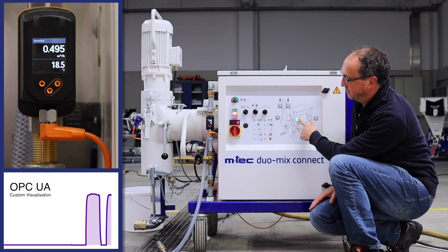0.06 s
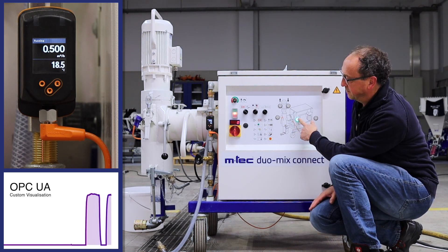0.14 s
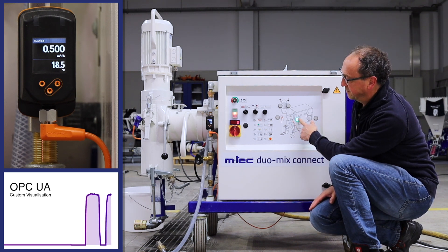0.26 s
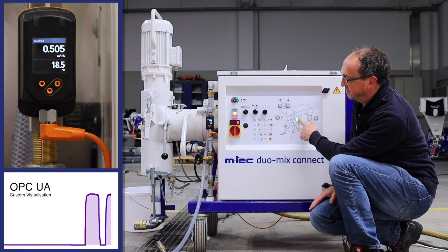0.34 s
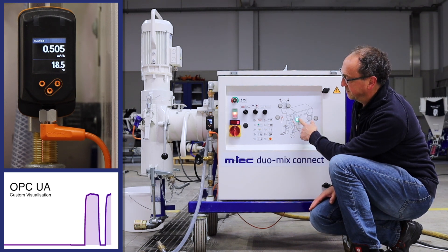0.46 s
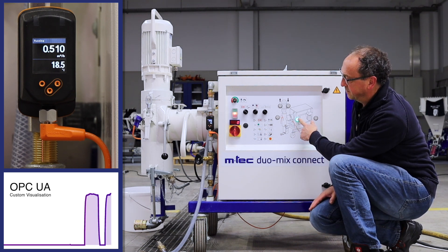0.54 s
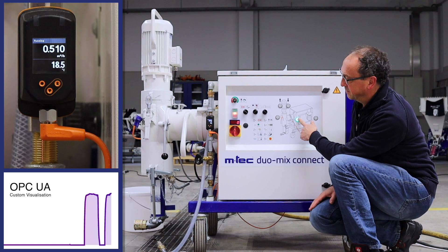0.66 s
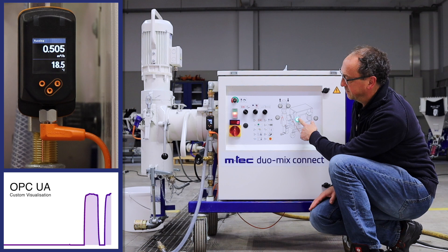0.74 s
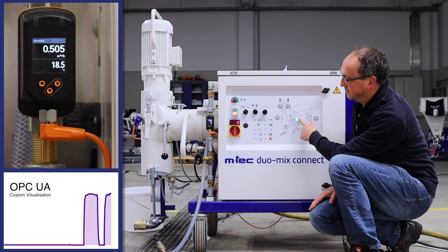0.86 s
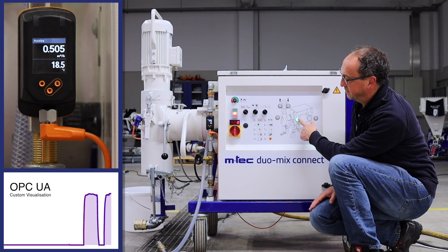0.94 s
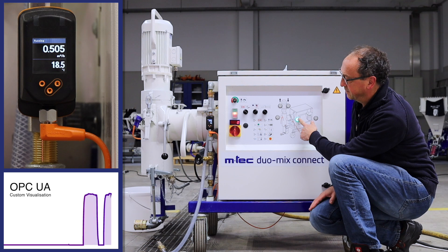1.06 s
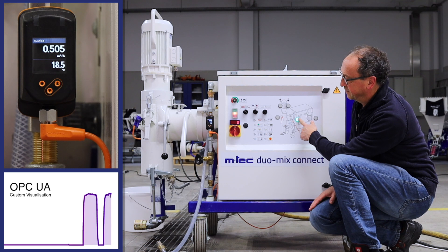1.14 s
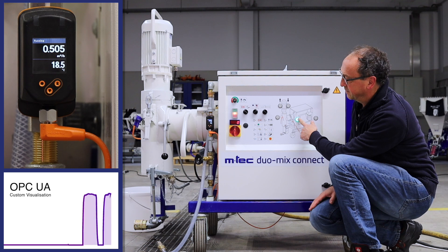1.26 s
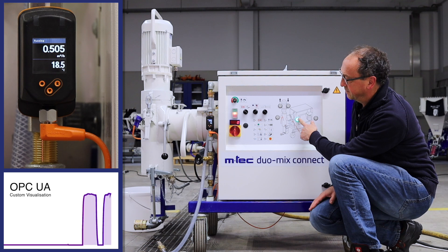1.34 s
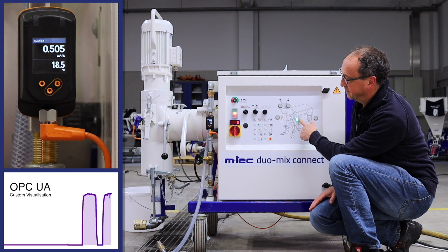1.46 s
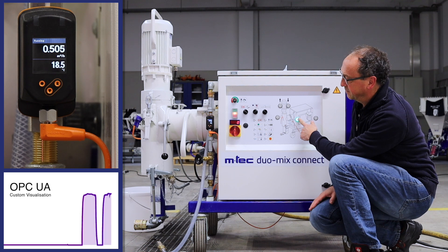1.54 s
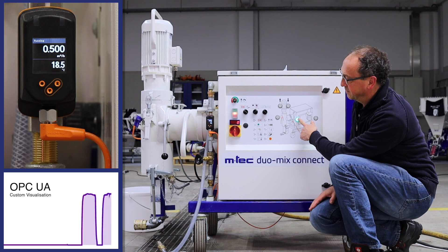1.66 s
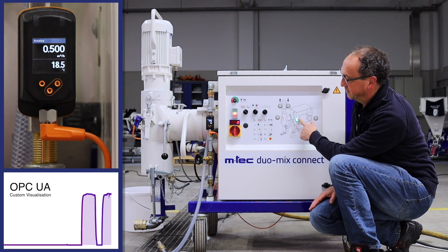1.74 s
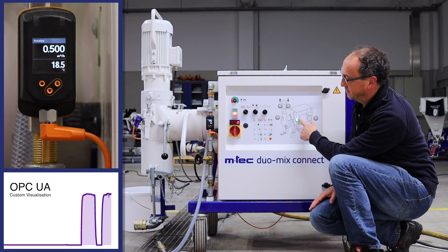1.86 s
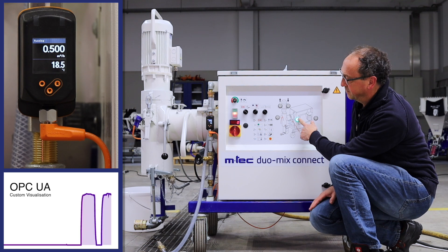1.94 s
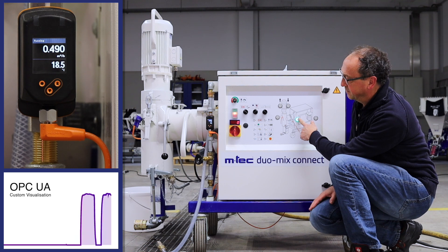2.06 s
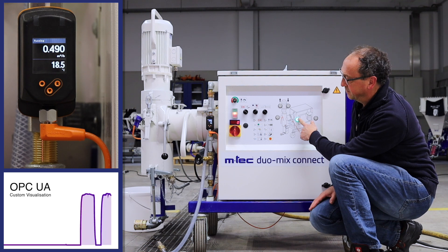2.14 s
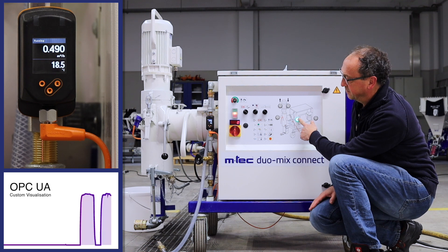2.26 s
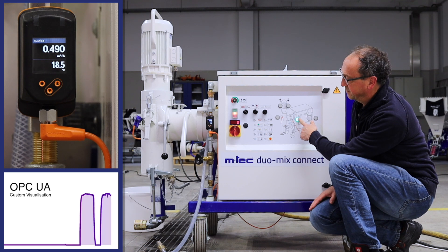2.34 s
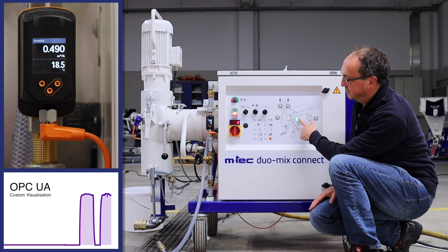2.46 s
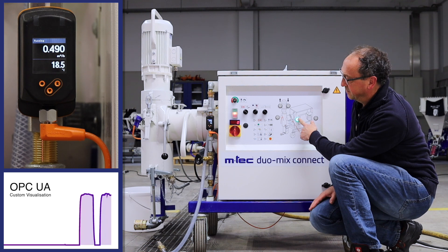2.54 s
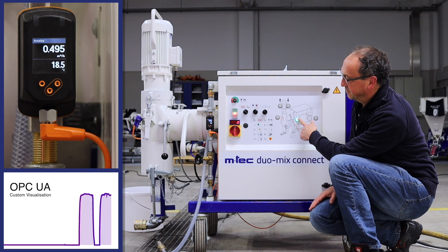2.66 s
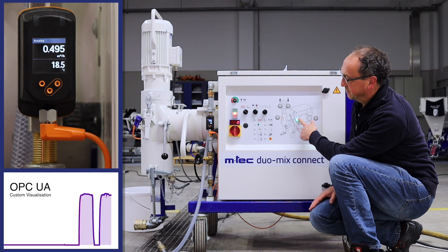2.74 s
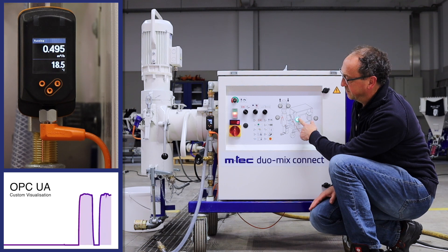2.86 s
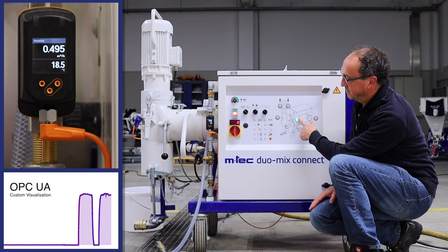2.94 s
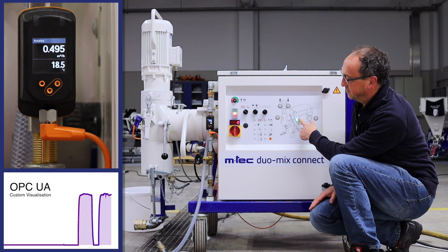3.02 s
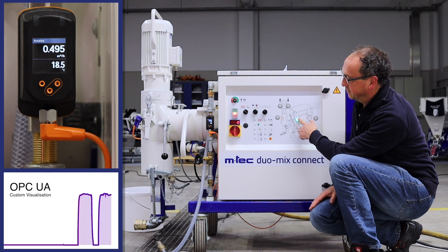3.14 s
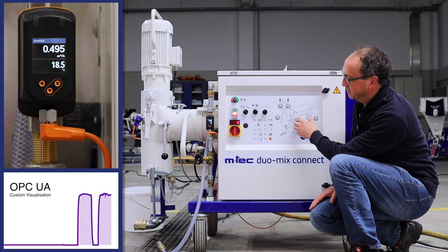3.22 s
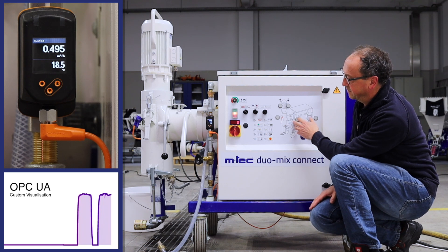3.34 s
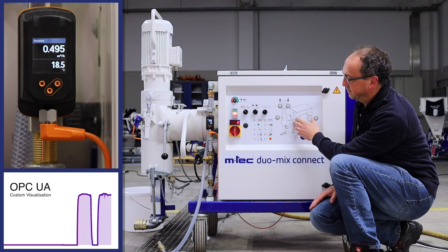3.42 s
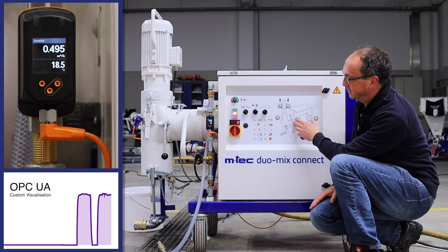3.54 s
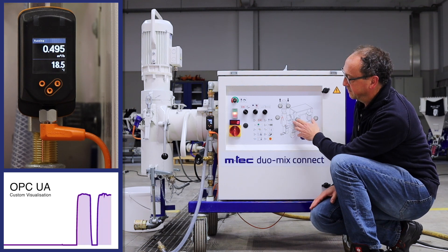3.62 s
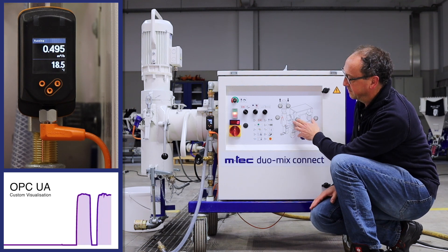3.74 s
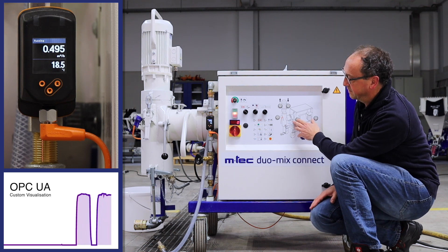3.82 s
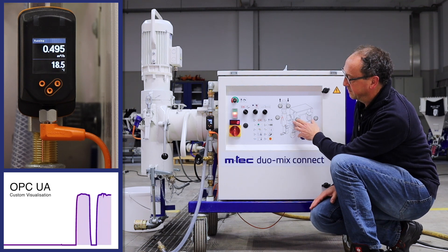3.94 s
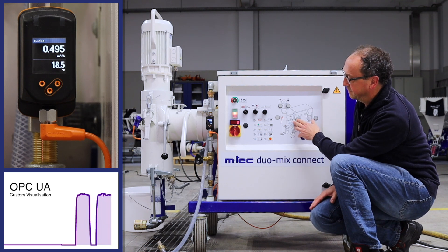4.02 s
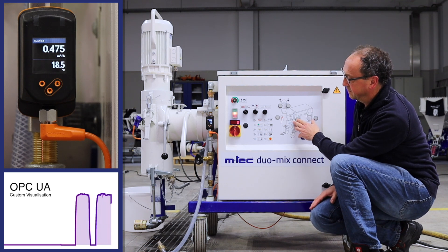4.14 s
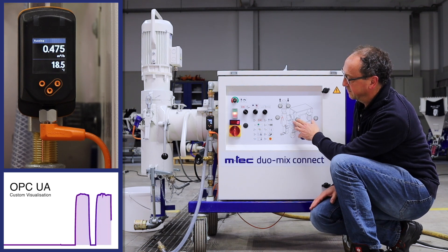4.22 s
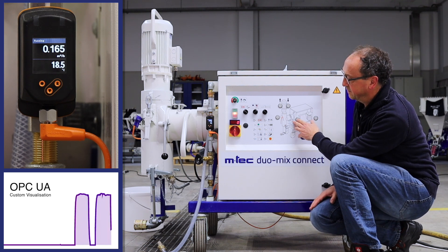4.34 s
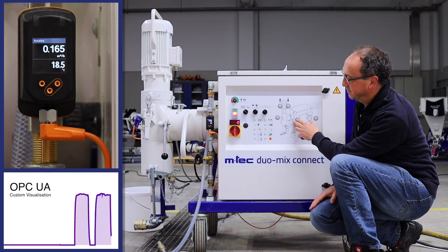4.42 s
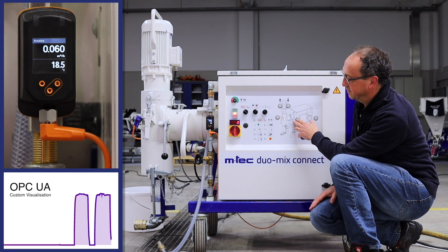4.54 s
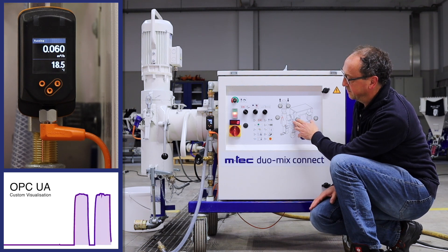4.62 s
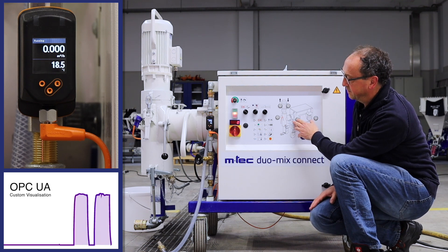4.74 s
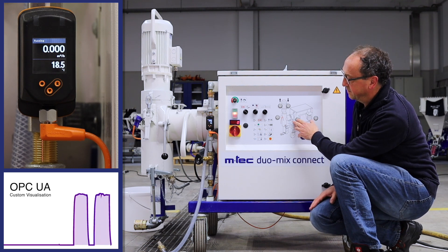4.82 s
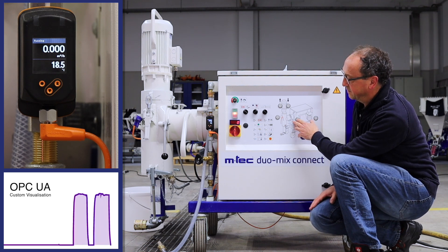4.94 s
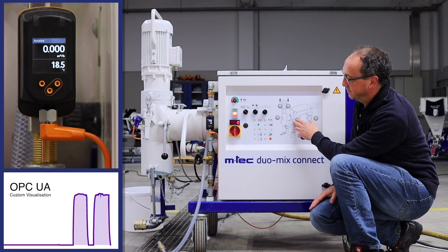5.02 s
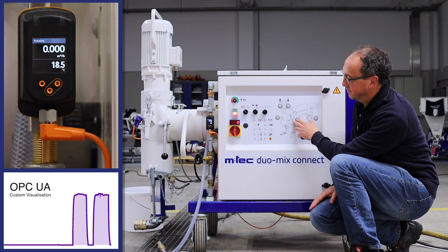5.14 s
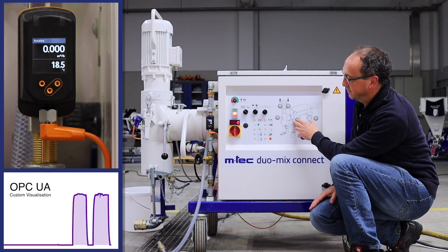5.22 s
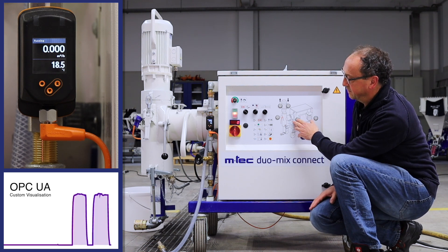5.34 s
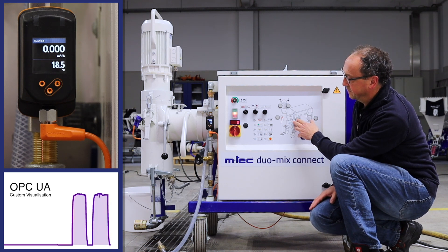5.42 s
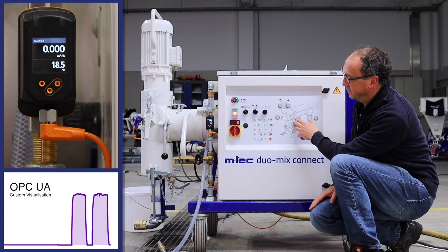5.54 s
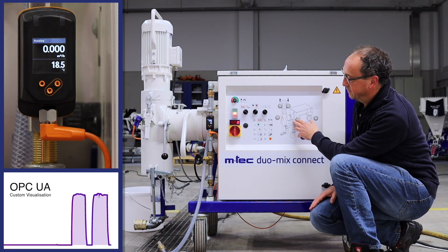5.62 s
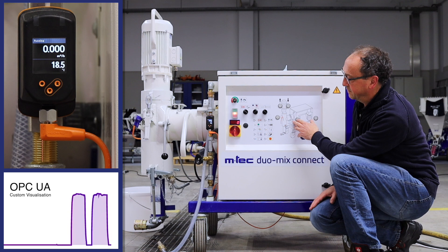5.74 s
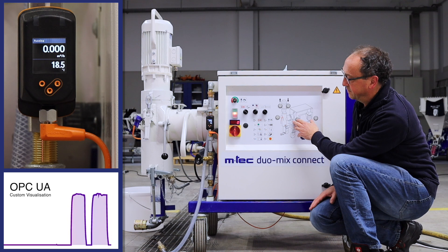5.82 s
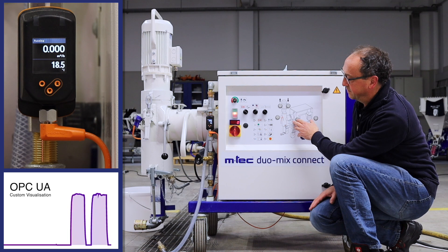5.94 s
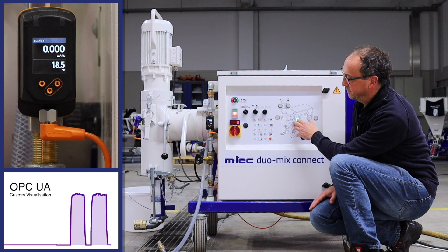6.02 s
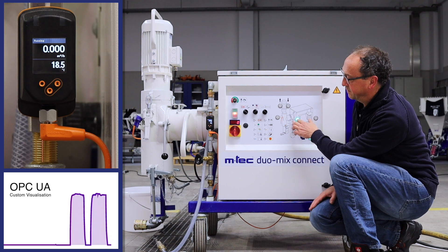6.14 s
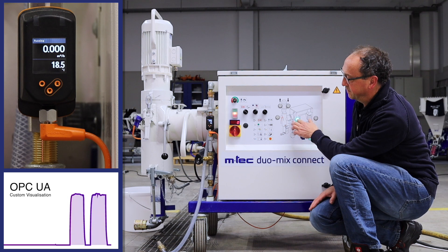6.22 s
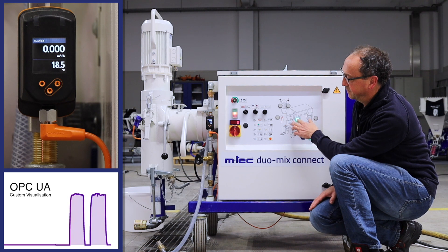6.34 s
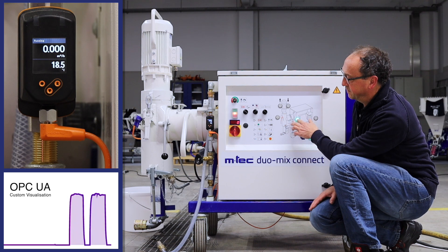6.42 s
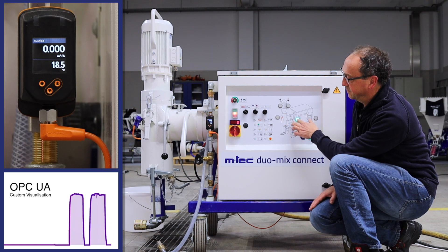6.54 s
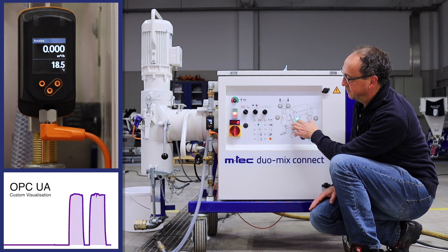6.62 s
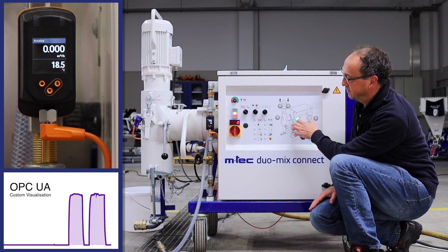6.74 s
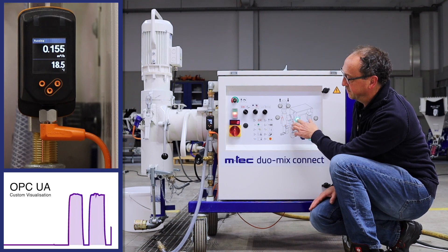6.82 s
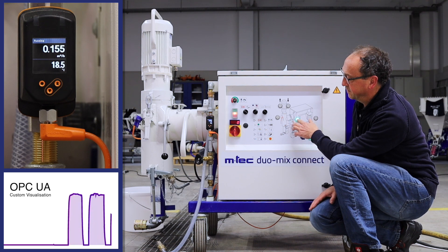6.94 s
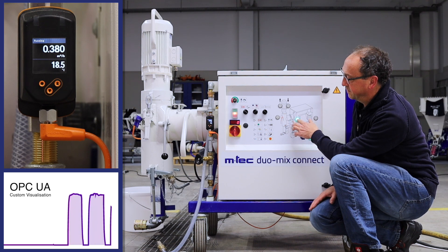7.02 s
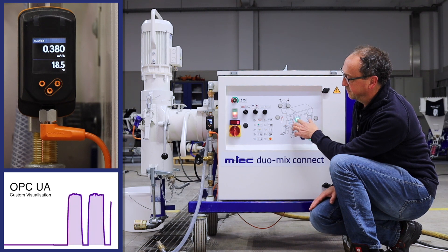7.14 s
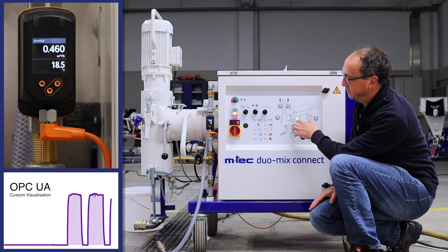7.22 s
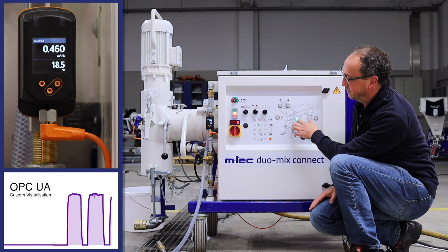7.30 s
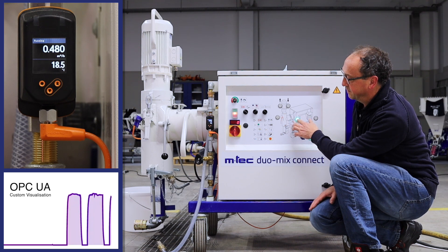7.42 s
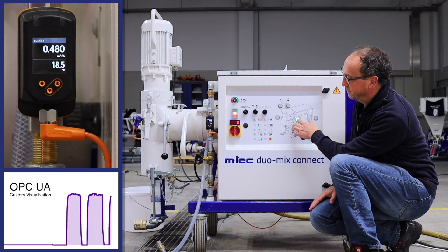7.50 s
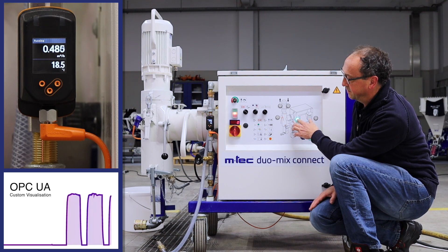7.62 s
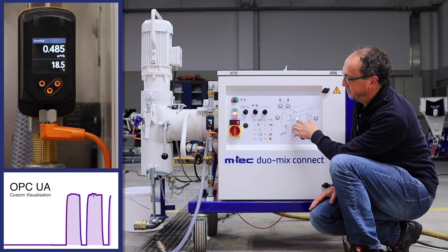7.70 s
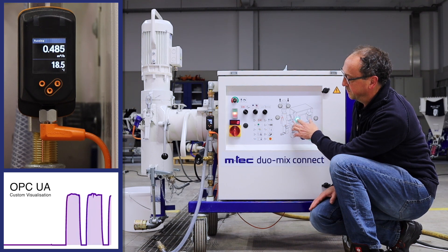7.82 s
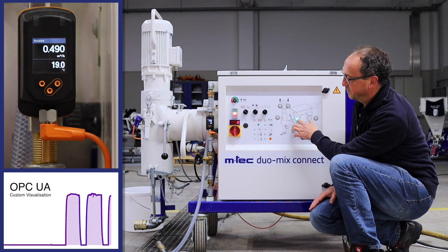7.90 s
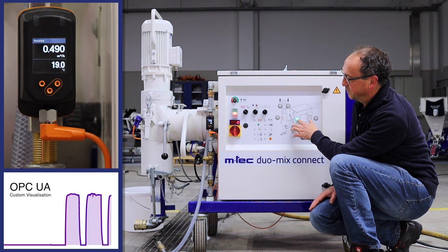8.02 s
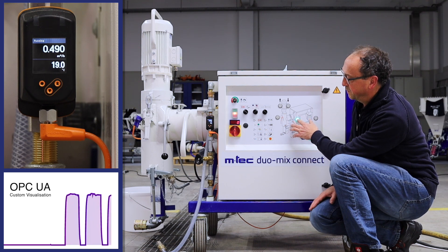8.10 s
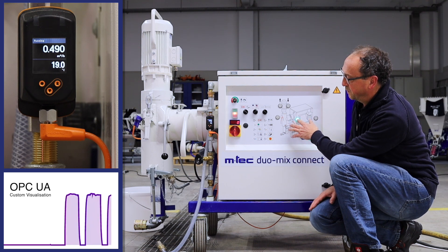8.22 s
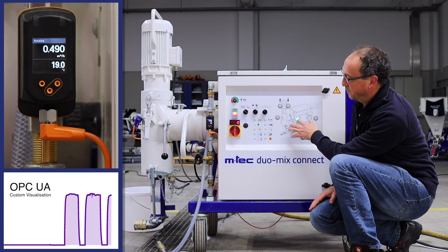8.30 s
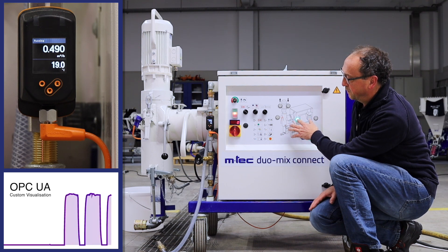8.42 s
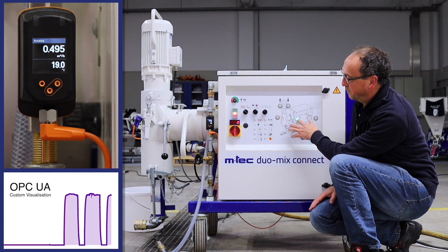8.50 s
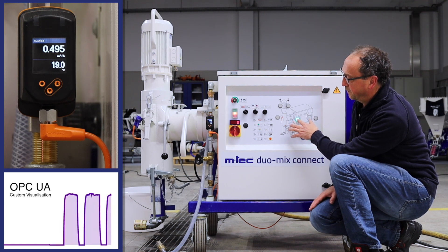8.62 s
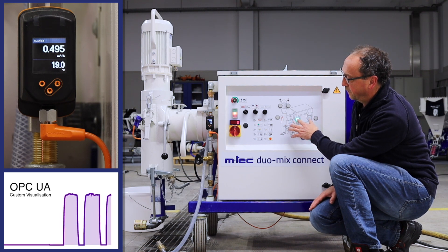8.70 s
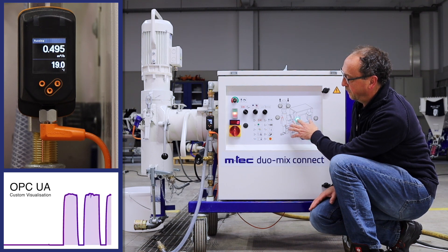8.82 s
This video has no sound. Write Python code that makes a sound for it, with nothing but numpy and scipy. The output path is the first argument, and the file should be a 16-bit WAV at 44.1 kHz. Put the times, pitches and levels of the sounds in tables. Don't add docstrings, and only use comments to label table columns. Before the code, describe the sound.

From 0 to 3.2 seconds an electric pump is already running in a large hard hall: a piercing, nearly constant whine around 1700 hertz, with fainter higher and lower tones, motor hum and a broad mid-range rush of water throbbing very fast. The whine wavers gently, weakening around 2.4 seconds. At about 3.25 a contactor clacks; the pitch plunges and the pump stops by 3.4, with a dull thump and short metal rattles until about 3.7. The hall's ring fades over roughly two seconds, leaving quiet distant hum and hiss. At about 6.06 a sharp double clack and frame jolt restart it; speed leaps up by 6.12, the pitch overshoots and flutters for a moment with a small water surge. The steady whine and rush then hold, slightly stronger from 7.4, still running at the end near 9 seconds. The microphone picks up strong room sound, with little deep bass.

```python
import sys
import numpy as np
from scipy import signal
from scipy.fft import rfft, irfft, next_fast_len
from scipy.io import wavfile

SR = 44100
rng = np.random.default_rng(int(sys.argv[2]) if len(sys.argv) > 2 else 0)


def to_wav(sig):
    pcm = np.clip(np.atleast_2d(sig), -1, 1) * 32767
    pcm = np.round(pcm).astype(np.int16)
    wavfile.write(sys.argv[1], SR, pcm.T)


def ratio_of_db(decibels):
    return 10 ** (np.asarray(decibels, float) / 20)


N = 390726
RUN_IN_S = 1.5
LEAD = int(RUN_IN_S * SR)
TIME = np.arange(-LEAD, N) / SR
SIZE = next_fast_len(N + LEAD + 3 * SR)
BIN_HZ = np.arange(SIZE // 2 + 1) * SR / SIZE + 1e-3


def rms_one(x):
    return x / np.sqrt(np.mean(x ** 2) + 1e-20)


def in_time(rows):
    return np.interp(TIME, *np.transpose(rows))


def at_hz(points, hz):
    point_hz, level_db = np.transpose(points)
    return np.interp(np.log(hz), np.log(point_hz), level_db)


def drift(rate_hz, times=TIME):
    control_hz = 400
    pole = np.exp(-2 * np.pi * rate_hz / control_hz)
    slow = signal.lfilter([1], [1, -2 * pole, pole ** 2], rng.standard_normal(5200))
    slow = rms_one(slow[800:])
    return np.interp((times - TIME[0]) * control_hz, np.arange(len(slow)), slow)


def coloured(spectrum):
    white = rfft(rng.standard_normal(SIZE))
    return rms_one(irfft(white * ratio_of_db(at_hz(spectrum, BIN_HZ)), SIZE)[:len(TIME)])


def resonances(modes):
    lift = 0
    for hz, width_hz, db in modes:
        lift = lift + ratio_of_db(db) / (1 + 1j * (BIN_HZ - hz ** 2 / BIN_HZ) / width_hz)
    return 1 + lift


SHAFT_HZ = (47.128, 47.10)
CHANGE_S = 5.0
SWING_PEAK_S, SWING_HZ, SWING_DEPTH, SWING_DECAY_S = 6.126, 27.5, 0.1604, 0.067
# time in seconds, share of full speed 0-1.
SHAFT_SPEED = [
    (3.242, 1),
    (3.256, .88),
    (3.286, .62),
    (3.33, .34),
    (3.385, 0),
    (6.08, 0),
    (6.108, .25),
    (6.12, 1),
]


def shaft():
    since = TIME - SWING_PEAK_S
    swing = SWING_DEPTH * np.exp(-np.maximum(since, 0) / SWING_DECAY_S) * np.cos(2 * np.pi * SWING_HZ * since)
    swinging = since > -.25 / SWING_HZ
    share = in_time(SHAFT_SPEED) * (1 + swing * swinging)
    full_hz = np.where(TIME < CHANGE_S, *SHAFT_HZ)
    return share, 2 * np.pi * np.cumsum(share * full_hz) / SR


BLADES, JITTER_RAD = 36, 0.0016
MAINS_HUM_HZ, MAINS_DB = 300.1, -48.5
WAVER_DB, LOW_WAVER_DB = 1.55, 1.5
UPPER_FADE = 13
# time in seconds, level in dB.
WHINE_DB = [
    [(0.0, -23.5), (0.37, -22.5), (0.59, -24), (0.7, -24), (1.35, -26), (1.84, -25.5), (2.42, -29),
     (2.79, -25), (3.2, -28)],
    [(6.6, -26), (6.68, -24), (7.22, -24.5), (7.42, -22), (8.05, -21.5), (8.86, -22)],
]
# multiple of shaft speed, level in dB in first run, in second run.
SHAFT_ORDERS = [(4, -45, -45), (4.028, -52, -52), (5.254, -51, -49), (7.38, -55, -53), (8, -56, -54),
                (12, -50, -50), (23.1, -56, -57), (24.88, -49, -51), (25, -50, -49), (32, -59, -57),
                (33, -58, -59), (34, -50, -51), (35, -47, -43), (37, -42, -49), (39, -46, -48),
                (40, -57, -57), (41, -58, -58), (65, -74, -77), (66, -72, -67), (70, -64, -74),
                (71, -56, -58), (72, -43, -46), (73, -55, -60), (74, -68, -72), (103, -70, -69),
                (105, -74, -71), (106, -63, -63), (107, -60, -59), (108, -44, -45), (109, -58, -59),
                (110, -62, -59), (111, -68, -71), (131, -73, -76), (132, -72, -78), (141, -74, -72),
                (142, -68, -80), (143, -59, -67), (144, -60, -53), (145, -65, -63), (146, -73, -69),
                (150, -69, -71), (156, -74, -79), (178, -72, -75), (179, -69, -69), (180, -64, -66),
                (181, -58, -58), (182, -62, -62), (214, -73, -76), (215, -69, -67), (216, -69, -71),
                (217, -70, -67), (251, -63, -62), (252, -67, -70), (253, -66, -65), (254, -73, -76),
                (286, -72, -72), (287, -66, -67)]


def pump_tones(path):
    share, angle = shaft()
    angle = angle + JITTER_RAD * drift(19)
    run = (TIME > CHANGE_S).astype(int)

    def path_gain(order):
        return np.array([np.maximum(np.interp(order * hz, BIN_HZ, np.abs(path)), 1) for hz in SHAFT_HZ])

    blade_gain = ratio_of_db(in_time(WHINE_DB[0] + WHINE_DB[1])) / path_gain(BLADES)[run]
    blade_tone = blade_gain * np.sin(BLADES * angle)

    turning = share > 0
    steps = TIME[turning][::64]
    step_run = run[turning][::64]
    low, upper = np.zeros(len(TIME)), np.zeros(len(TIME))
    for order, *levels_db in SHAFT_ORDERS:
        waver_db = (WAVER_DB if order > 24 else LOW_WAVER_DB) * drift(2.85, steps)
        gain = (ratio_of_db(levels_db) / path_gain(order))[step_run] * ratio_of_db(waver_db)
        gain = np.repeat(gain, 64)[:turning.sum()]
        tone = gain * np.sin(order * angle[turning] + rng.uniform(0, 2 * np.pi))
        group = upper if order > 1.5 * BLADES else low
        group[turning] += tone

    off_s, on_s = SHAFT_SPEED[0][0], SHAFT_SPEED[-3][0]
    powered = (TIME < off_s) | (TIME > on_s)
    hum_gain = ratio_of_db(MAINS_DB + drift(1.5)) / np.interp(MAINS_HUM_HZ, BIN_HZ, np.abs(path))
    hum = powered * hum_gain * np.sin(2 * np.pi * MAINS_HUM_HZ * TIME)
    steady = np.exp(-UPPER_FADE * np.abs(1 - share))
    return np.sqrt(2) * ((blade_tone + low) * share ** 0.53 + upper * steady + hum)


# frequency in Hz, width in Hz, lift in dB.
CASING_MODES = [(579, 42, 25.5), (1065, 92, 19.5), (1280, 130, 17), (1460, 66, 19), (1850, 70, 20)]


def casing():
    return resonances(CASING_MODES)


RUSH_DB, RUSH_THROB = -42.5, 0.19
# frequency in Hz, level in dB per Hz.
RUSH_SPECTRUM = [(30, -44), (90, -18.5), (160, -19), (200, 1), (350, -1.5), (470, -5.5), (680, -1.5),
                 (1300, -6), (1650, -2), (2100, -12.5), (3000, -24), (6000, -25.5), (10000, -34),
                 (14000, -29), (15600, -53)]
# time in seconds, level in dB.
FLOW_DB = [
    (3.25, 3),
    (3.3, 1),
    (3.4, -7),
    (3.5, -71),
    (6.07, -58),
    (6.085, -11),
    (6.12, 2.5),
    (6.3, 1),
]
# frequency in Hz, width in Hz, lift in dB.
WATER_MODES = [(186, 5.2, 4.5), (349.8, 18.4, 1), (674, 53, 3.5), (2620, 90, 1.5), (3327, 41, 20),
               (5100, 230, 4.5), (6680, 120, 6)]


def rush():
    throb = 1 + RUSH_THROB * np.sin(shaft()[1])
    level = ratio_of_db(RUSH_DB + in_time(FLOW_DB) + 0.88 * drift(5.2))
    return rfft(level * throb * coloured(RUSH_SPECTRUM), SIZE) * resonances(WATER_MODES)


KNOCK_TOP_HZ, KNOCK_RISE_S = 11900, 0.0043
# start in seconds, level in dB, t60 in seconds, dullness 0-1.
CONTACT_KNOCKS = [(3.245, -31, 0.44, 0.84), (3.258, -49, .03, .3), (3.286, -52, .03, 0.4),
                  (3.364, -18, 0.017, 1), (3.406, -39.5, .03, .2), (3.447, -27, 0.037, 0.75),
                  (3.49, -56, 0.027, 0.4), (3.515, -44, 0.037, 0.3), (3.54, -35, .03, 0.5),
                  (3.73, -43, .03, 0.55), (6.0615, -40, .03, 0.74), (6.0773, -29.5, 0.048, 0)]
# start in seconds, level in dB, frequency in Hz, t60 in seconds.
FRAME_JOLTS = [
    (3.3, -58, 64, .3),
    (3.72, -68, 68.4, 6.0),
    (6.061, -40, 277, .05),
    (6.085, -45, 280, .15),
    (6.1, -61, 70, 0.27),
]


def knocks():
    out, t = np.zeros(len(TIME)), np.arange(SR // 2) / SR
    for s, level_db, t60_s, dull in CONTACT_KNOCKS:
        crackle = signal.lfilter([1 - dull], [1, -dull], rng.standard_normal(len(t)))
        i = LEAD + int(s * SR)
        out[i:i + len(t)] += ratio_of_db(level_db - 60 * t / t60_s) * crackle * np.minimum(t / KNOCK_RISE_S, 1)
    out = signal.sosfilt(signal.butter(2, KNOCK_TOP_HZ, fs=SR, output="sos"), out)
    fade = np.minimum(1, (t[-1] - t) / .04)
    for s, level_db, hz, t60_s in FRAME_JOLTS:
        i = LEAD + int(s * SR)
        out[i:i + len(t)] += ratio_of_db(level_db - 60 * t / t60_s) * np.sin(2 * np.pi * hz * t) * fade
    return out


HALL_GAP_S = 0.0066
EARLY_T60_S, EARLY_DB = .2, 2.0
# frequency in Hz, t60 in seconds, diffuse level over the direct sound in dB.
HALL_DECAY = [(60, 2.6, 7), (166, 1.25, 3.5), (490, 1.8, 6), (1000, 2.05, 5.5), (2010, 2.02, 5.5),
              (4900, 1.32, 3), (9150, 0.74, 0.5), (15000, 0.56, -3)]
# frequency in Hz, width in Hz, lift in dB.
STANDING_WAVES = [(1696.2, 1.8, 14), (1683, 2.2, 10), (1712, 2.0, 10)]


def hall_response():
    t, tail = np.arange(3 * SR) / SR, 0
    edges_hz = 40 * 2 ** np.arange(0, 9.1, 1)
    white = rng.standard_normal(len(t))
    hz, t60s, levels_db = np.transpose(HALL_DECAY)

    def decay(t60_s):
        return ratio_of_db(-60 * t / t60_s) * np.sqrt(6 * np.log(10) / t60_s / SR)

    for low, high in zip(edges_hz, edges_hz[1:]):
        band = signal.sosfilt(signal.butter(2, [low, high], "band", fs=SR, output="sos"), white)
        centre = np.log(low * high) / 2
        t60_s = np.interp(centre, np.log(hz), t60s)
        level_db = np.interp(centre, np.log(hz), levels_db)
        early = ratio_of_db(EARLY_DB - 10.5) * decay(EARLY_T60_S)
        tail = tail + band * ratio_of_db(level_db) * (decay(t60_s) + early)
    tail = tail * np.clip(t / HALL_GAP_S - .5, 0, 1)
    return resonances(STANDING_WAVES) + rfft(tail, SIZE)


FLOOR_DB = -57.5
# frequency in Hz, level in dB per Hz.
FLOOR_SPECTRUM = [(15, -42), (25, -34), (59, 0.5), (101, -7.5), (140, -8), (313, -11), (598, -2.5),
                  (666, -9), (826, -5.5), (3340, -29.5), (15500, -37.5)]


def hall_floor():
    return ratio_of_db(FLOOR_DB + 0.47 * drift(6.1)) * coloured(FLOOR_SPECTRUM)


def scene():
    hall = hall_response()
    path = hall * casing()
    tones = rfft(pump_tones(path), SIZE) * path
    others = (rush() + rfft(knocks(), SIZE)) * hall
    return (irfft(tones + others, SIZE)[:len(TIME)] + hall_floor())[None, LEAD:]


def roll_off(x):
    return signal.sosfilt(signal.butter(12, 15650, fs=SR, output="sos"), x)


MIC_LOW_HZ, SELF_NOISE_DB = 62, -77.5


def record(dry):
    cut = signal.sosfilt(signal.butter(2, MIC_LOW_HZ, "high", fs=SR, output="sos"), dry)
    mix = cut + ratio_of_db(SELF_NOISE_DB) * rng.standard_normal(dry.shape)
    return roll_off(mix)


dry = scene()
out = record(dry)
to_wav(out)
```